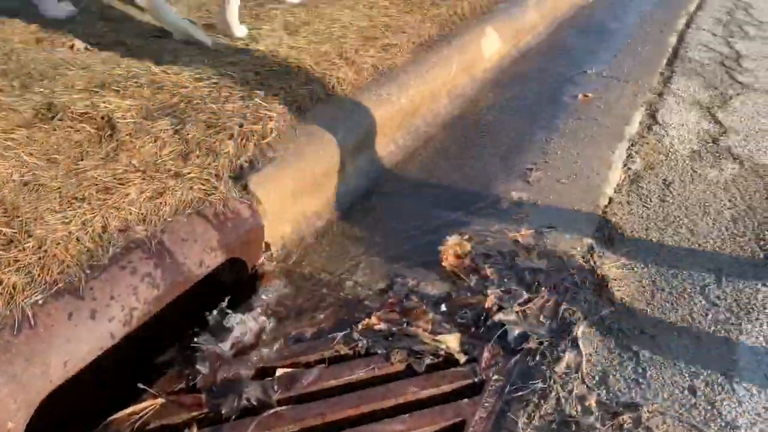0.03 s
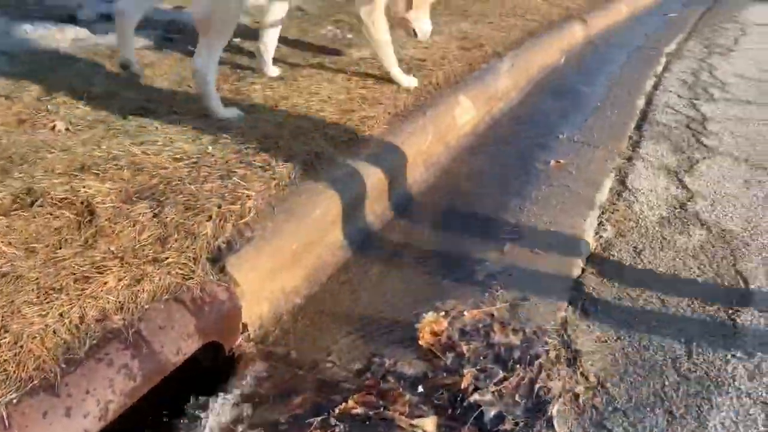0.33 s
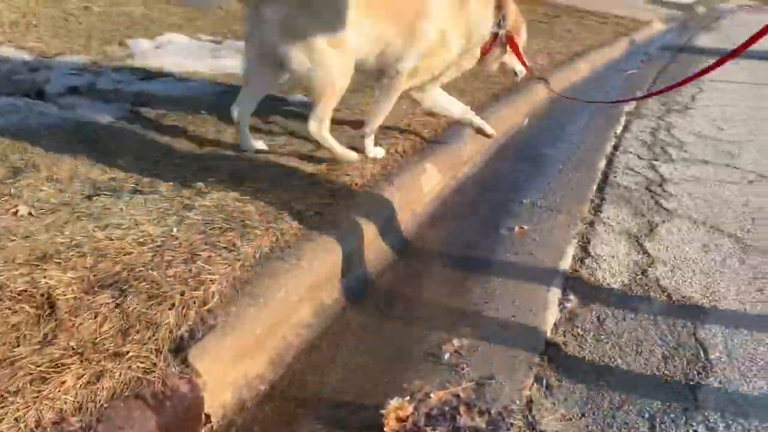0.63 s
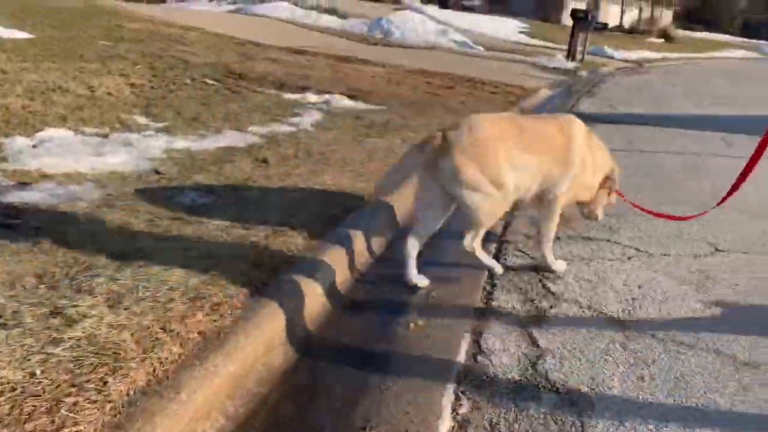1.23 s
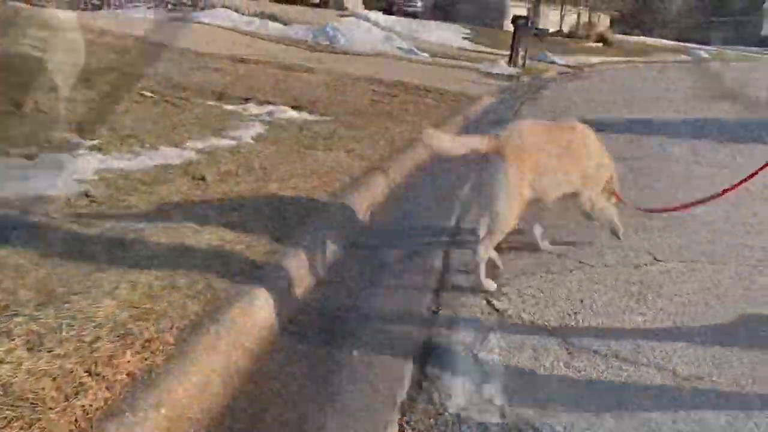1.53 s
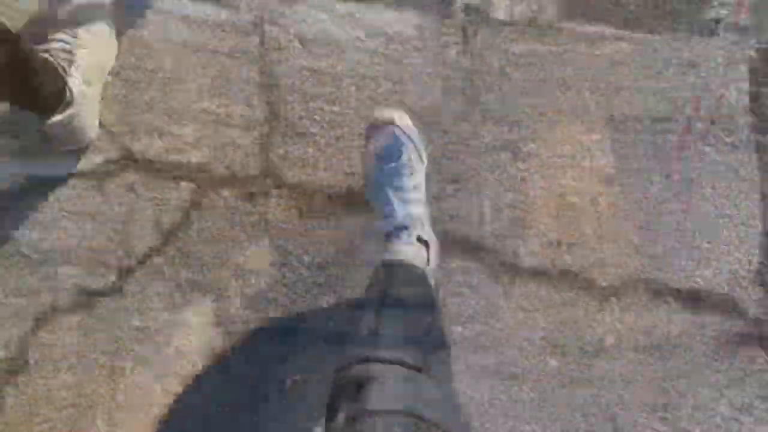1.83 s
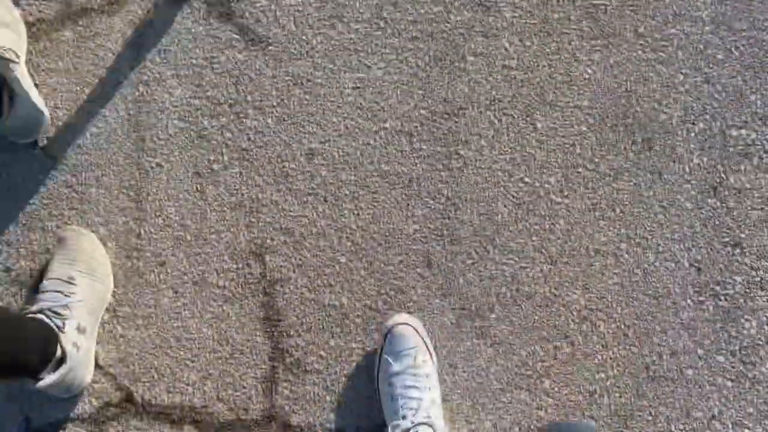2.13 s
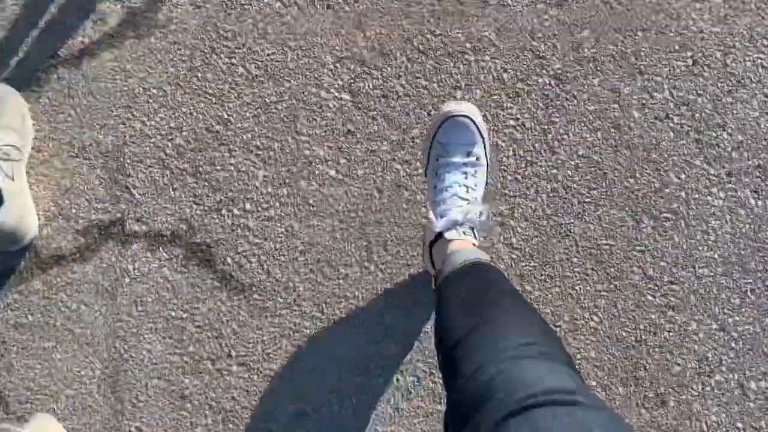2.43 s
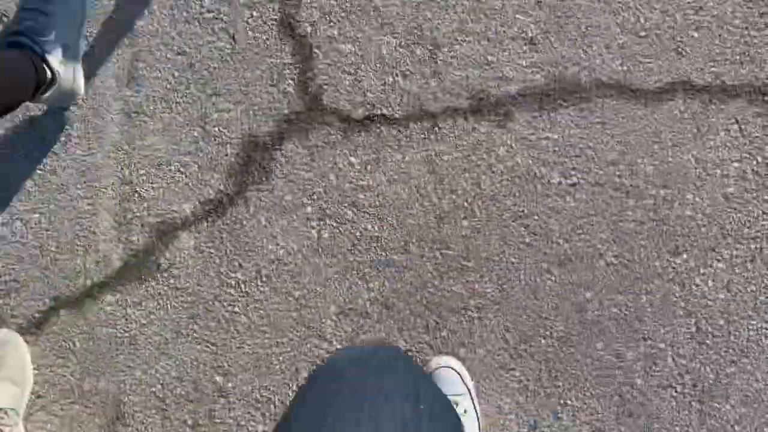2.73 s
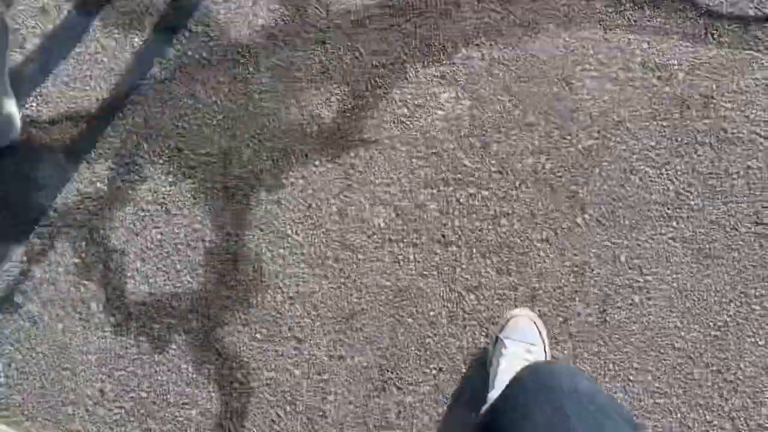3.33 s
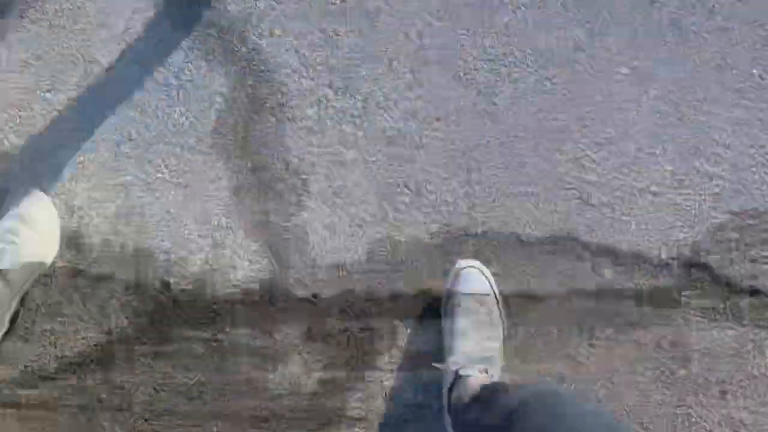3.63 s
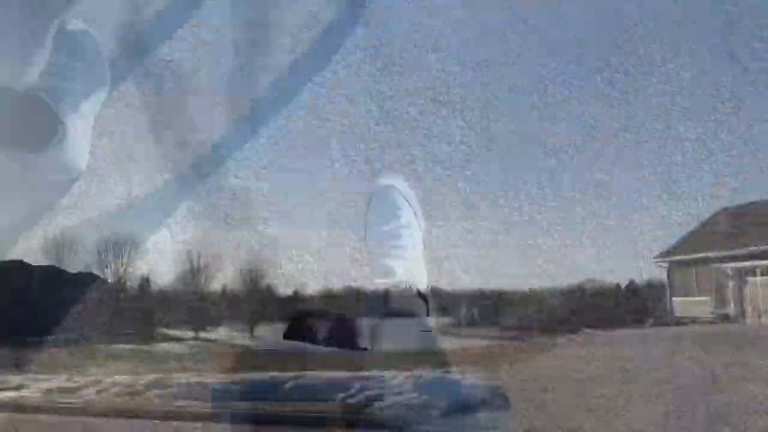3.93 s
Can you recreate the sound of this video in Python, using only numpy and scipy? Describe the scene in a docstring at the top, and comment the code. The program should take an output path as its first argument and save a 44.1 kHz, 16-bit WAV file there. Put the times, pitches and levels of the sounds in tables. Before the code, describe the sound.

Water splashes and gurgles into a storm drain, then fades to footsteps and gusty wind.

```python
"""Meltwater splashes through a storm drain's grate, and its bubbles ring the chamber below.
It trickles and babbles along the curb and fizzes on the grate, fading out just after two seconds.
Then a walker's sneakers scuff and click on gritty asphalt, over a faint wash of distant traffic.
Eddies thud on the microphone throughout, and a light breeze turns gusty during the walk."""
import sys
import numpy as np
from scipy import signal
from scipy.fft import rfft, irfft
from scipy.io import wavfile

SR = 44100
rng = np.random.default_rng(int(sys.argv[2]) if len(sys.argv) > 2 else 0)


def master(y):
    """Save y as 16-bit WAV."""
    cut = np.clip(np.atleast_2d(y).T, -1, 1)
    pcm = np.round(cut * 32767)  # scale
    wavfile.write(sys.argv[1], SR, pcm.astype(np.int16))


N = 176400
T, HZ = np.arange(N) / SR, np.fft.rfftfreq(N, 1 / SR)

# Faders for the water layers: time_s, drain_db, gutter_db, spray_db
WATER_FADERS = [(0, -29, -39, -24.5), (.45, -30.5, -37.5, -25.5), (.7, -30.5, -35.5, -26),
                (.9, -29.5, -32, -26.5), (1.02, -34, -36, -25), (1.23, -36, -33, -29),
                (1.45, -46, -35.5, -31.5), (1.82, -51, -40, -40), (2.0, -60, -47.5, -48.5),
                (2.1, -73, -62.5, -66), (2.25, -110, -110, -110)]
CHAMBER_LEAD_MS, GUTTER_LEAD_MS = .125, .238  # how much earlier the left channel hears them


def amp(db):
    """Decibels to gain."""
    return 10 ** (np.asarray(db) / 20)


def unit(x):
    """Scales to rms 1."""
    return x / np.sqrt(np.mean(x ** 2) + 1e-20)


def fader(rows, column=1):
    """Gain over time from one dB column of a curve."""
    rows = np.array(rows)
    return amp(np.interp(T, rows[:, 0], rows[:, column]))


def colour(x, eq):
    """Shapes a spectrum with an EQ curve; white noise keeps its power."""
    hz, db = np.transpose(eq)
    gain = amp(np.interp(np.log(HZ + 1), np.log(hz + 1), db))
    return irfft(rfft(x) * unit(gain), N)


def resonate(x, modes):
    """Rings a cavity's modes with x; the result has rms 1."""
    response = sum(amp(db) / (1 + 2j * (HZ - hz) / width) for hz, width, db in modes)
    return unit(irfft(rfft(x) * response, N))


def noise():
    """Two unrelated white noises."""
    return rng.standard_normal((2, N))


def wander(rate_hz):
    """Smooth random motion of rms 1."""
    return unit(irfft(rfft(rng.standard_normal(N)) / (1 + (HZ / rate_hz) ** 4), N))


def clicks(per_s, spread_db):
    """Two random click trains of uneven size."""
    size = amp(spread_db * np.minimum(rng.exponential(1, (2, N)), 4))
    return np.sign(noise()) * size * (rng.random((2, N)) < per_s / SR)


def struck(start, decay_s):
    """Envelope with a near-instant attack and exponential decay."""
    t = np.maximum(T - start, 0)
    return np.minimum(t / .0003, 1) * np.exp(-np.minimum(t / decay_s, 40))


def stereo(pair, same, lead_ms=0):
    """Mixes a pair as mid and side for two microphone ports; a positive lead puts the left first."""
    mid, side = rfft(pair)
    same = np.clip(same, 0, .999)
    mid, side = mid * np.sqrt((1 + same) / 2), side * np.sqrt((1 - same) / 2)
    lag = np.exp(-2j * np.pi * HZ * lead_ms / 1000)
    return irfft(np.array([mid + side, (mid - side) * lag]), N)


def bubbles(low_hz, high_hz, per_s, cycles, rise, spread_db, count=24):
    """Swarm of short rings whose pitch rises as they die; cycles sets the decay time in periods."""
    swarm = np.zeros((2, N))
    for hz in np.geomspace(low_hz, high_hz, count):
        age = np.arange(0, 5, hz / (cycles * SR))  # in decay times
        ring = np.exp(-age) * np.sin(2 * np.pi * cycles * age * (1 + rise * age))
        swarm += signal.oaconvolve(clicks(per_s / count, spread_db), hz * ring[None], axes=1)[:, :N]
    return unit(swarm)


def street():
    """Distant traffic blurs into a low, wavering wash."""
    # Traffic tone: frequency_hz, gain_db
    traffic_eq = [(30, 24), (150, 11), (400, -2), (800, -6), (1500, -0.5), (2200, -7.5), (3200, -12.5),
                  (4500, -24), (7000, -22), (8500, -25.5), (16000, -21)]
    # Traffic fader: time_s, level_db
    traffic_levels = [(0, -57.5), (2.1, -43.5), (2.6, -41.5), (2.85, -44), (3.2, -43.5), (3.55, -44.5),
                      (3.9, -49), (4, -47.5)]
    return unit(colour(noise(), traffic_eq)) * fader(traffic_levels) * amp(0.91 * wander(11))


def wind():
    """Lumpy turbulence at the microphone: a breeze, joined by gusts during the walk."""
    # Breeze fader: time_s, level_db
    breeze_levels = [(0, -36), (.4, -36.5), (.6, -34.5), (.9, -40), (1.06, -36), (1.4, -34), (1.7, -40),
                     (1.95, -41), (4, -41)]
    # Soft low end of the breeze: frequency_hz, gain_db
    breeze_eq = [(15, -39), (35, -9), (55, 2.5), (85, -1.5), (150, -9.5), (250, -19.5), (500, -33.5),
                 (1200, -45), (4000, -100)]
    # Gust faders: time_s, rumble_db, flutter_db
    gusts = [(1.8, -43, -69), (1.94, -30, -37.5), (2.08, -39, -36), (2.16, -22, -36), (2.25, -26, -36),
             (2.335, -35, -30.5), (2.37, -32.5, -74), (2.465, -24.5, -36), (2.51, -42, -39),
             (2.66, -33, -40), (2.71, -24, -38), (2.77, -29, -52), (2.88, -31, -46.5), (2.98, -32, -46),
             (3.09, -42, -73), (3.15, -59, -73), (3.36, -54, -68), (3.45, -30, -49), (3.51, -41, -60),
             (3.54, -37, -36.5), (3.62, -32.5, -45), (3.78, -43.5, -51), (3.87, -29.5, -51),
             (4.0, -33.5, -55)]
    # Bass weight of the gusts: frequency_hz, gain_db
    rumble_eq = [(15, -23), (35, -31), (55, 1.5), (90, -0.5), (140, -5.5), (200, -15), (320, -26.5),
                 (800, -63), (4000, -100)]
    # Low-mid flapping above it: frequency_hz, gain_db
    flutter_eq = [(20, -24), (70, -39), (170, 4), (260, 0), (400, -10), (600, -16), (1000, -28),
                  (2500, -55), (8000, -93)]
    breeze = stereo(unit(colour(noise(), breeze_eq)), same=1) * fader(breeze_levels)
    rumble = stereo(unit(colour(noise(), rumble_eq) * amp(2.2 * wander(44))), same=.74)
    flutter = stereo(unit(colour(noise(), flutter_eq) * amp(4 * wander(60))), same=.55)
    fade_in = np.clip((T - gusts[0][0]) / 0.016, 0, 1)
    return breeze + fade_in * (rumble * fader(gusts, column=1) + flutter * fader(gusts, column=2))


def buffets():
    """An eddy hits the microphone: a rough thud that sags in pitch."""
    # Wind thuds: start_s, level_db, start_pitch_hz
    eddies = [(0.161, -18, 522), (0.475, -14.5, 212), (1.025, -20, 111), (1.063, -18, 503),
              (1.093, -18, 167), (1.953, -29.5, 644), (2.158, -20, 235), (2.2, -19, 558), (2.288, -35, 512),
              (2.318, -40, 710), (2.697, -18, 336), (2.873, -18, 151), (2.916, -21, 172),
              (3.085, -21.5, 130), (3.576, -31, 617), (3.607, -17.5, 304), (3.864, -17.5, 190),
              (3.941, -20, 284)]
    end_hz, sag_s, attack_s, decay_s = 58, 0.00721, 0.0039, 0.017
    thuds = np.zeros(N)
    for start, db, hz in eddies:
        t = np.maximum(T - start, 0)
        turns = end_hz * t + (hz - end_hz) * sag_s * (1 - np.exp(-t / sag_s))
        envelope = amp(db) * np.minimum(t / attack_s, 1) * struck(start, decay_s)
        thuds += envelope * np.sin(2 * np.pi * turns + .6 * wander(130))
    return thuds


def footsteps():
    """Soles crunch over loose grit in uneven spurts; single grains snap and the shoe knocks dryly."""
    # Soles dragging on asphalt: centre_s, level_db, half_length_s
    drags = [(2.19, -54, 0.065), (2.39, -52, 0.042), (2.584, -55.5, .055), (2.744, -54, 0.048),
             (2.942, -49.5, 0.042), (3.133, -52.5, 0.07), (3.237, -46, 0.037), (3.346, -56, 0.072),
             (3.456, -48.5, 0.04), (3.646, -64, 0.11), (3.79, -63, 0.022), (3.933, -68, 0.074)]
    # Scuff tone: frequency_hz, gain_db
    scuff_eq = [(300, 11.5), (900, 0.5), (2000, 9), (3300, 2.5), (5000, -5), (7500, -4.5), (8500, -8.5),
                (11000, -8.5), (16000, -10)]
    # Grit and shoe clicks: start_s, snap_db, knock_db, knock_pitch_hz
    hits = [(2.168, -40, -43, 1490), (2.416, -43, -39.5, 1030), (2.4585, -32.5, -20, 1750),
            (2.538, -49, -33.5, 1160), (2.729, -40.5, -34.5, 3230), (2.817, -34, -59, 7560),
            (2.89, -35, -39.5, 3200), (2.925, -41, -41.5, 4200), (3.0377, -43.5, -53, 940),
            (3.1197, -42.5, -46, 3550), (3.1965, -43, -48, 3900), (3.2369, -42, -42, 1920),
            (3.246, -45, -48, 2930), (3.438, -30.5, -26, 6800), (3.478, -50, -31, 1440),
            (3.977, -73, -46, 800)]
    # Crisp tone of a snapping grain: frequency_hz, gain_db
    snap_eq = [(300, 5), (1200, 17.5), (3500, 1), (6000, 18.5), (8500, 12.5), (11000, 7.5), (16000, 14.5)]
    rub = sum(amp(db) / (1 + ((T - centre) / half) ** 4) for centre, db, half in drags)
    spurts = amp(2.5 * wander(45))
    grit = amp(5) * unit(clicks(260, spread_db=4))
    scuffs = unit(colour((noise() + grit) * spurts, scuff_eq)) * rub
    snap_envelope = sum(amp(db) * struck(start, decay_s=0.0024) for start, db, _, _ in hits)
    snaps = colour(noise() * snap_envelope, snap_eq)
    knocks = np.zeros(N)
    for start, _, db, hz in hits:
        rough_phase = 2 * np.pi * hz * (T - start) + .9 * wander(hz / 5)
        knocks += amp(db) * struck(start, decay_s=7 / hz) * np.sin(rough_phase)
    return scuffs + snaps + np.array([knocks, np.zeros(N)])  # knocks feed the mid only


def spray():
    """Fine droplets fizz on the grate."""
    # Airy top end of the spray: frequency_hz, gain_db
    spray_eq = [(1000, -28.5), (4000, -17.5), (6600, -0.5), (7800, 0.5), (8200, -6), (10000, 6.5),
                (12000, 3), (16000, 3)]
    hiss = noise()
    droplets = bubbles(5058, 15250, per_s=2000, cycles=21.6, rise=0.036, spread_db=2, count=40)
    ticks = unit(clicks(1500, spread_db=-1))
    fizz = unit(colour(hiss + amp(-3) * droplets + amp(1) * ticks, spray_eq))
    return stereo(fizz * amp(0.87 * wander(19)), same=.8, lead_ms=-.183) * fader(WATER_FADERS, column=3)


def gutter():
    """A shallow stream of tiny bubbles, with brighter blips, ringing pockets and a few splashes."""
    # Trickle tone: frequency_hz, gain_db
    trickle_eq = [(200, -42), (600, 3), (950, 2.5), (1200, -7.5), (1500, -1.5), (1950, -4.5), (2800, 6.5),
                  (3900, 7.5), (4700, 0.5), (5600, 1.5), (7500, -2), (16000, -120)]
    # Pockets along the curb where the stream rings: pitch_hz, half_width_hz, gain_db
    pockets = [(1000, 21, -2), (1445, 28, 7), (3330, 48, 11.5), (3864, 54, 2), (4560, 48, 5)]
    # Splash accents: start_s, level_db, decay_s
    accents = [(.18, -27, 0.054), (0.873, -34, 0.015), (1.016, -24, 0.009), (1.206, -27.5, .018),
               (1.743, -36, 0.0044), (1.916, -54, 0.011)]
    # Their bright tone: frequency_hz, gain_db
    splash_eq = [(600, -19), (4500, 2), (7200, 5.5), (16000, -10)]
    fine = bubbles(944, 7580, per_s=3000, cycles=7.1, rise=0.0208, spread_db=0.5, count=48)
    trickle = colour(unit(fine + amp(-3) * noise()), trickle_eq)
    blips = bubbles(2400, 4800, per_s=80, cycles=22, rise=.01, spread_db=3)
    ringing = resonate(clicks(820, spread_db=-2), pockets)
    flow = unit(trickle + amp(-8.5) * blips + amp(-0.5) * ringing)
    stream = stereo(flow * amp(2.1 * wander(11.4)), same=0.62, lead_ms=GUTTER_LEAD_MS)
    splash_envelope = sum(amp(db) * struck(start, decay) for start, db, decay in accents)
    splashes = stereo(colour(noise() * splash_envelope, splash_eq), same=0.2, lead_ms=GUTTER_LEAD_MS)
    return stream * fader(WATER_FADERS, column=2) + splashes


def babble():
    """Bubbles ring all along the stream, and in bursts where it folds over."""
    # Glugs of the folding stream: start_s, level_db
    glugs = [(0.228, -32), (0.497, -26), (.677, -22), (0.834, -17.5), (.885, -21), (1.065, -26),
             (1.232, -22.5), (1.282, -30), (1.361, -29), (1.503, -23), (1.606, -26), (1.744, -30)]
    steady = bubbles(1830, 2800, per_s=170, cycles=15, rise=.012, spread_db=2.5)
    crowd = bubbles(1750, 2900, per_s=2500, cycles=9, rise=.012, spread_db=1)
    bursts = sum(amp(db) * struck(start, decay_s=0.0053) for start, db in glugs)
    chatter = amp(-3) * steady * fader(WATER_FADERS, column=2) + crowd * bursts
    return stereo(chatter, same=0.95, lead_ms=GUTTER_LEAD_MS)


def plops():
    """Single large bubbles ring in the drain, each bending slightly up in pitch."""
    # Featured bubbles: start_s, level_db, pitch_hz
    notes = [(.227, -23, 2275), (.277, -34, 1310), (.352, -22, 2285), (.491, -24, 2300), (.53, -24, 2440),
             (0.675, -20, 2400), (.694, -31.5, 877), (.714, -25.5, 1940)]
    decay_s, rise = 0.012, 0.0039
    rings = np.zeros(N)
    for start, db, hz in notes:
        t = T - start
        turns = hz * t * (1 + rise * t / decay_s)
        rings += amp(db) * struck(start, decay_s) * np.sin(2 * np.pi * turns)
    return stereo(np.array([rings, np.zeros(N)]), same=1, lead_ms=CHAMBER_LEAD_MS)


def drain():
    """Falling water churns and gurgles, ringing the chamber under the grate."""
    # Hollow modes of the chamber: pitch_hz, half_width_hz, gain_db
    chamber_modes = [(913, 33, -9.5), (1002, 33, 1), (1262, 23, 1.5), (1320, 25, 2), (1405, 31, -2),
                     (1652, 120, -5.5), (1930, 73, 0.5), (2337, 92, 5.5)]
    # Tone of the direct splash: frequency_hz, gain_db
    splash_eq = [(150, -17), (350, 2), (650, -1.5), (1300, -3), (2200, 13), (3000, -4), (3900, 10.5),
                 (4400, 13.5), (4900, -1), (7000, -50), (16000, -38)]
    churn = bubbles(456, 5220, per_s=1200, cycles=4, rise=0.024, spread_db=2) + amp(-4.5) * noise()
    gurgle = bubbles(850, 2600, per_s=110, cycles=19, rise=.006, spread_db=3, count=36)
    hollow = unit(resonate(churn, chamber_modes) + amp(-4.5) * gurgle)
    chamber = amp(-6) * stereo(hollow, same=0.87, lead_ms=CHAMBER_LEAD_MS)
    splash = amp(-7.5) * stereo(unit(colour(churn, splash_eq)), same=1, lead_ms=.176)
    return (chamber + splash) * amp(0.27 * wander(49.3)) * fader(WATER_FADERS, column=1)


def scene():
    """The mix: water with the drain a little to the left, then feet, traffic and wind."""
    pan_left = amp([[1.1], [-1.1]])
    water = (drain() + plops()) * pan_left + gutter() + babble() + spray()
    feet = stereo(footsteps(), same=0.92, lead_ms=-.276)
    traffic = stereo(street(), same=0.24, lead_ms=-.276)
    return water + feet + traffic + wind() + buffets()


def record(dry):
    """A steep high cut takes off the very top of the treble."""
    cutoff_hz = 15900
    high_cut = signal.firwin(511, cutoff_hz, window=("kaiser", 9), fs=SR)
    return signal.oaconvolve(dry, high_cut[None], "same")


dry = scene()
out = record(dry)
master(out)
```